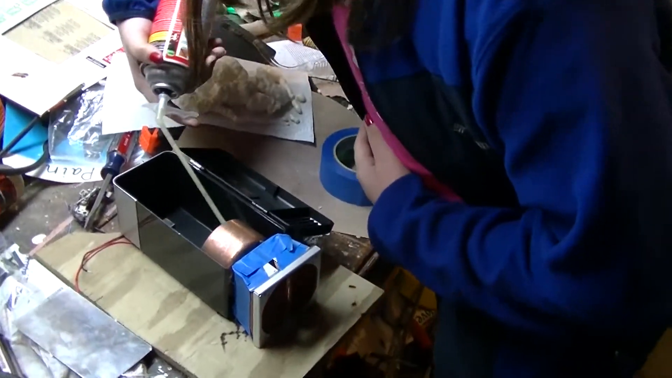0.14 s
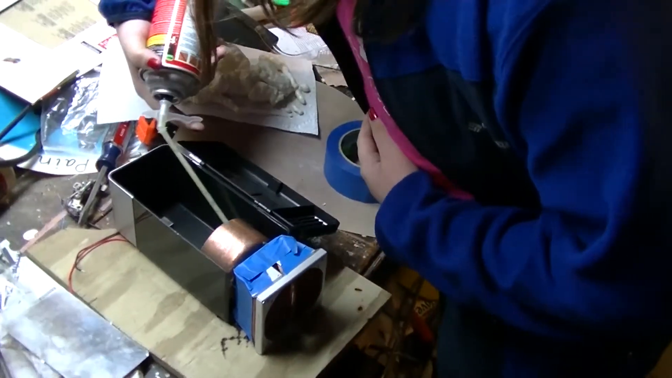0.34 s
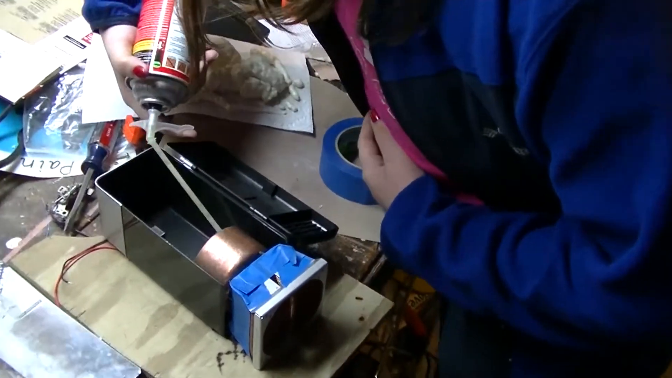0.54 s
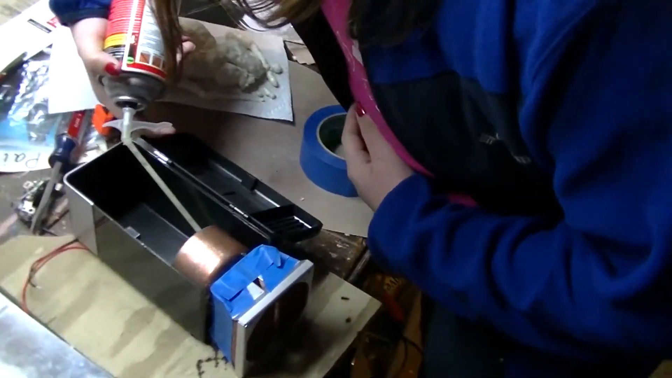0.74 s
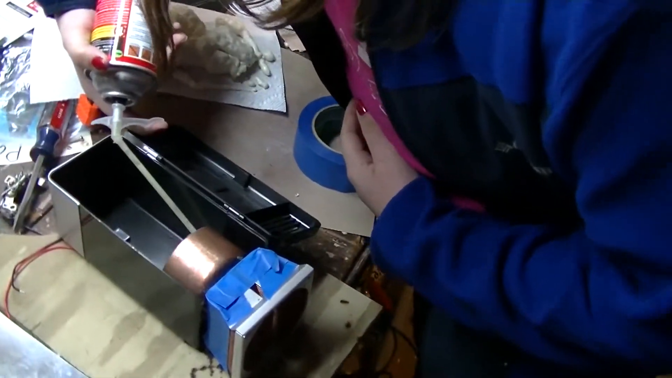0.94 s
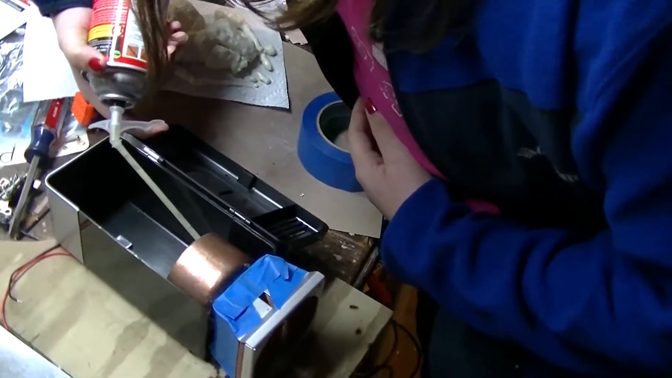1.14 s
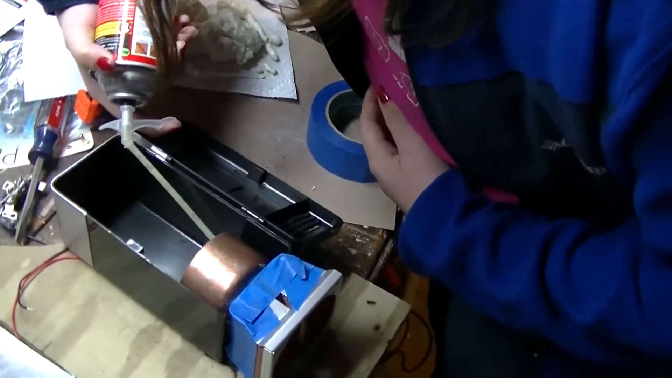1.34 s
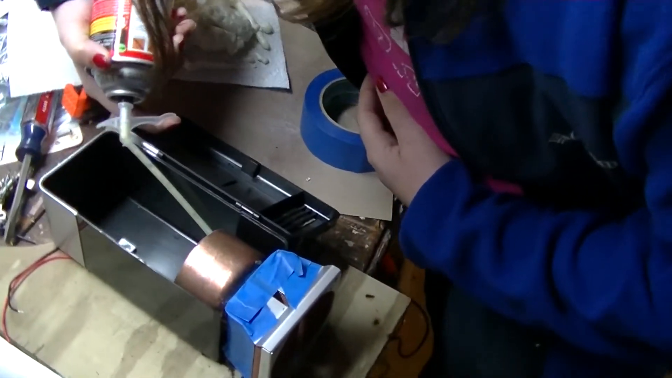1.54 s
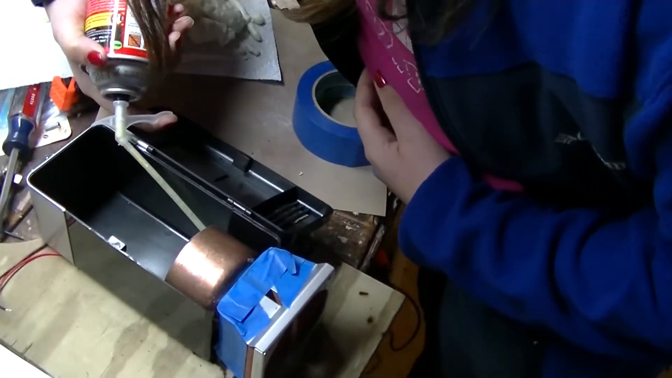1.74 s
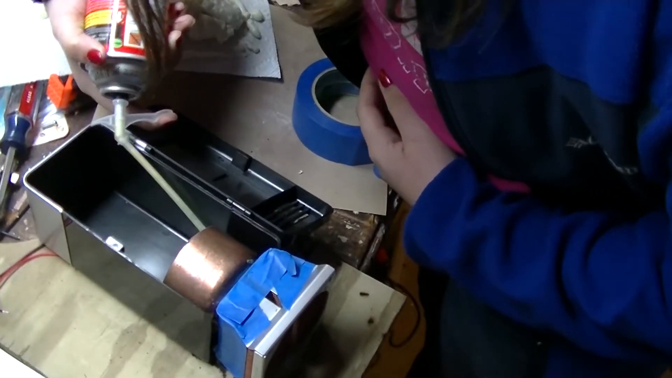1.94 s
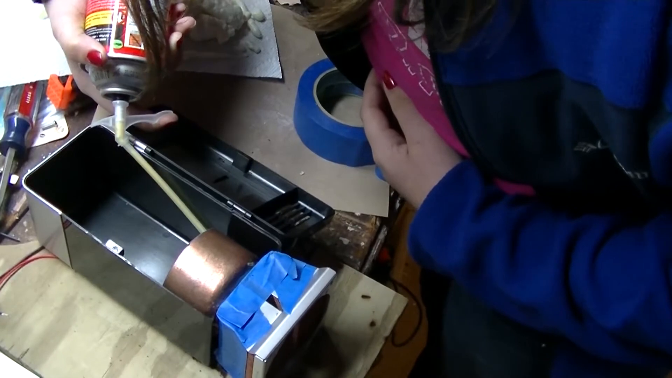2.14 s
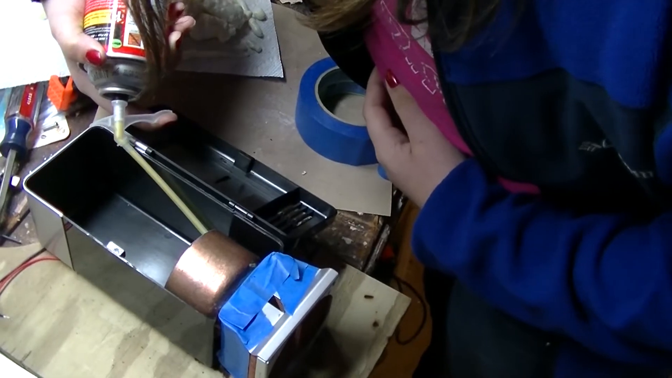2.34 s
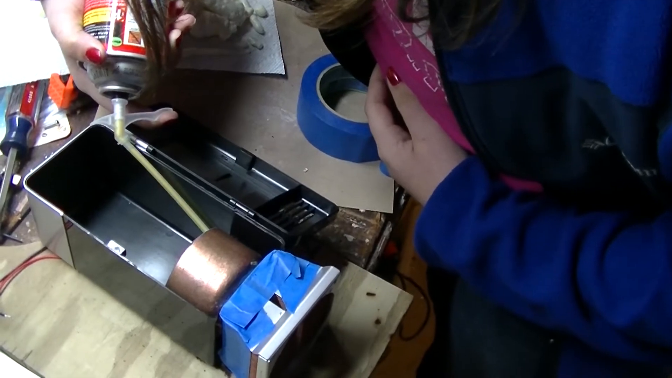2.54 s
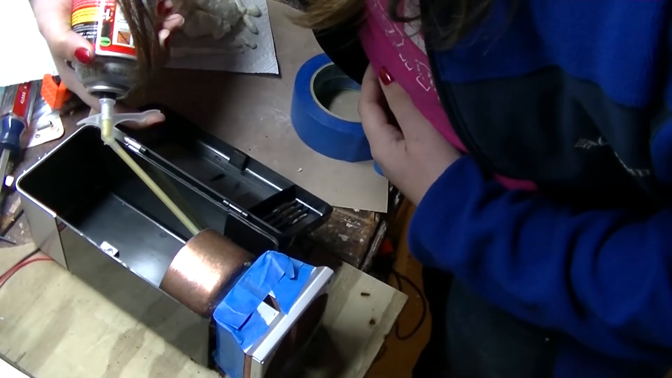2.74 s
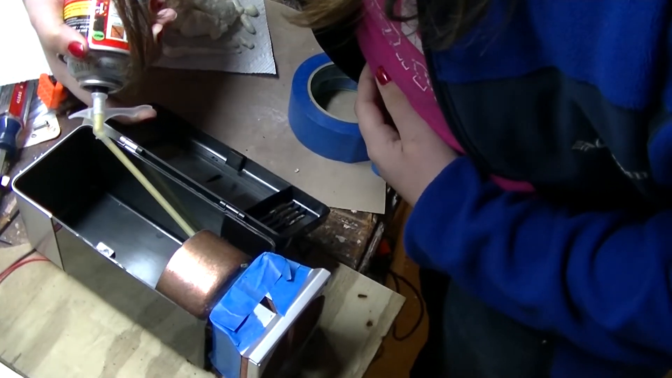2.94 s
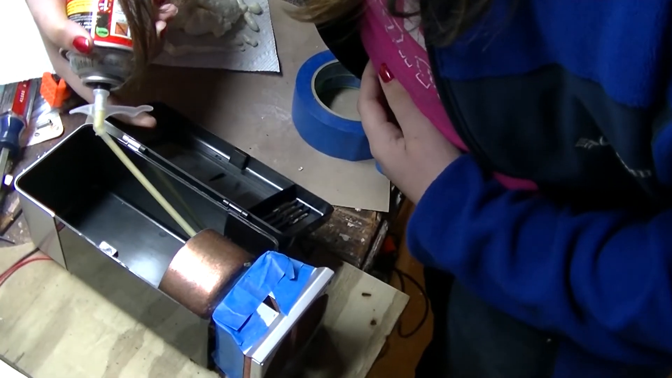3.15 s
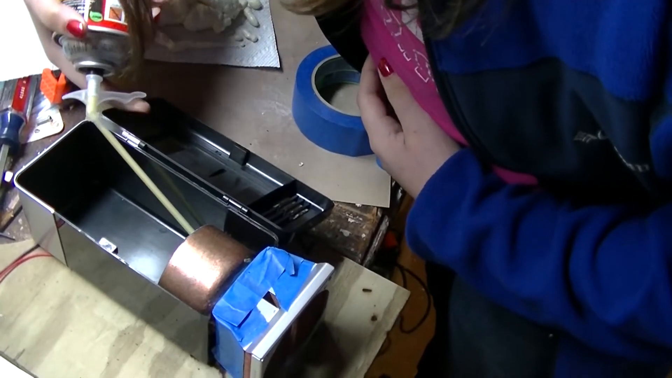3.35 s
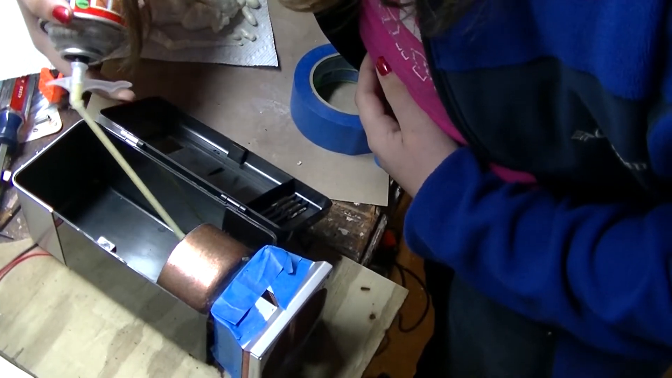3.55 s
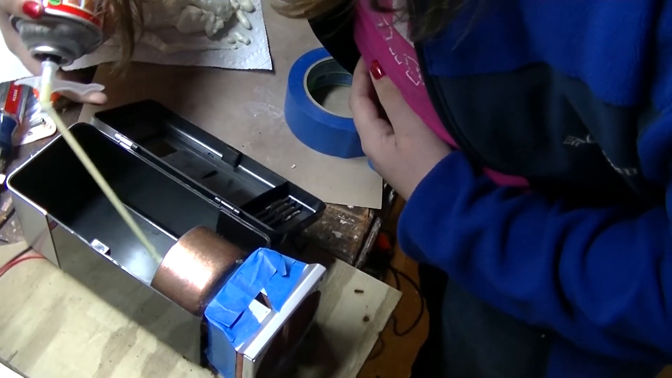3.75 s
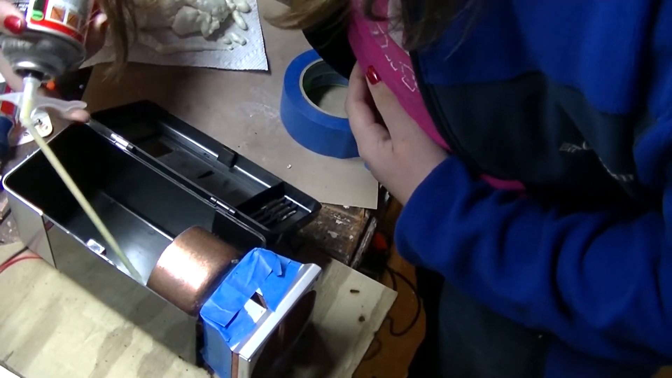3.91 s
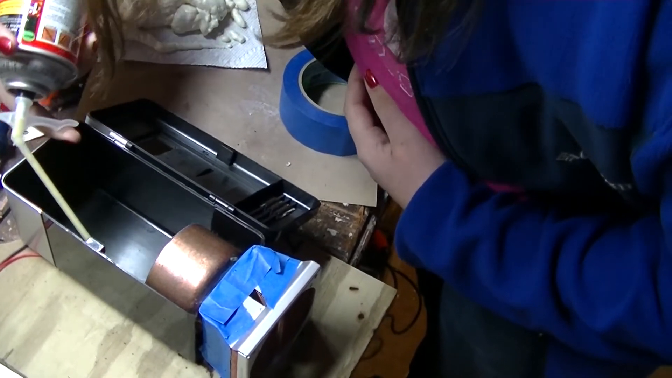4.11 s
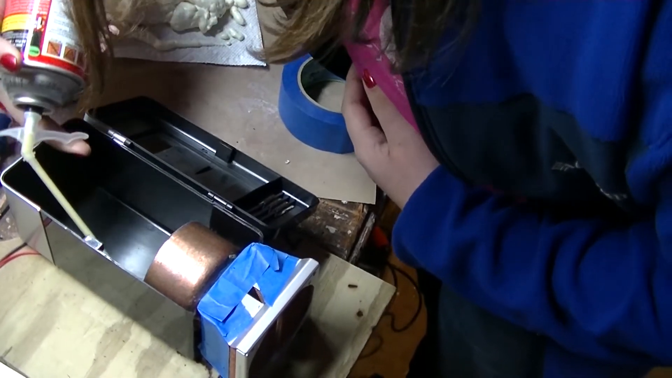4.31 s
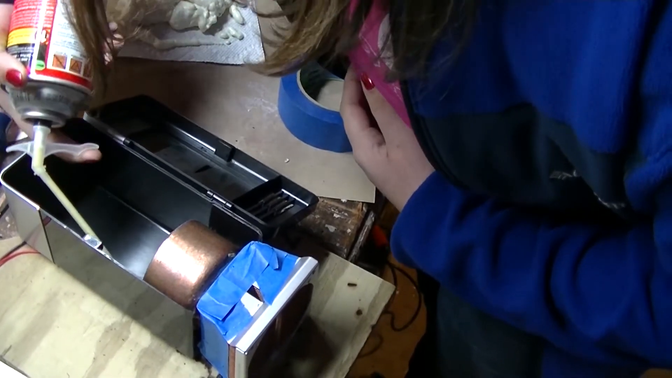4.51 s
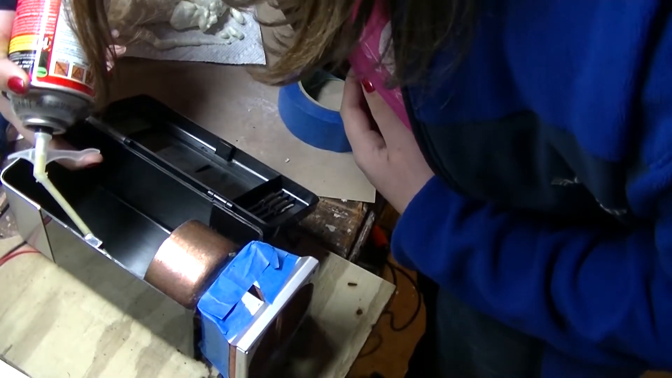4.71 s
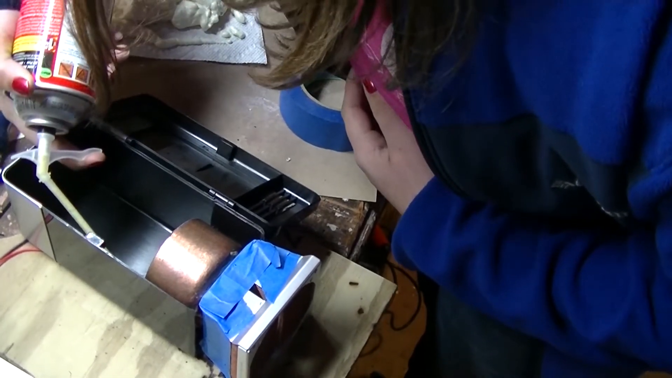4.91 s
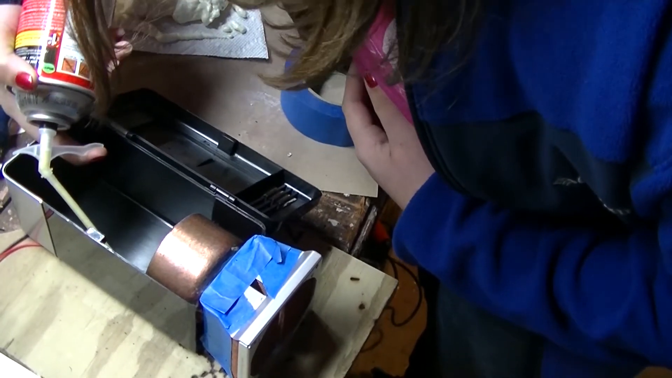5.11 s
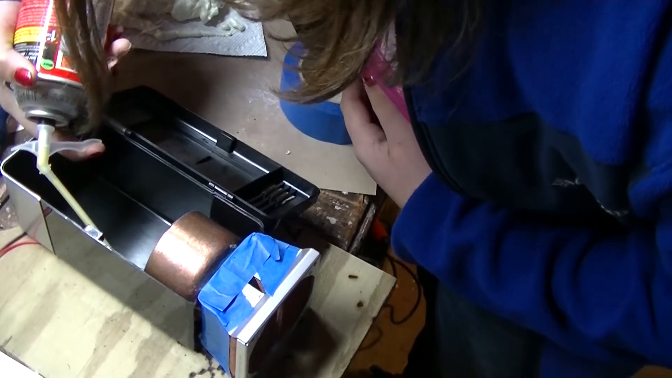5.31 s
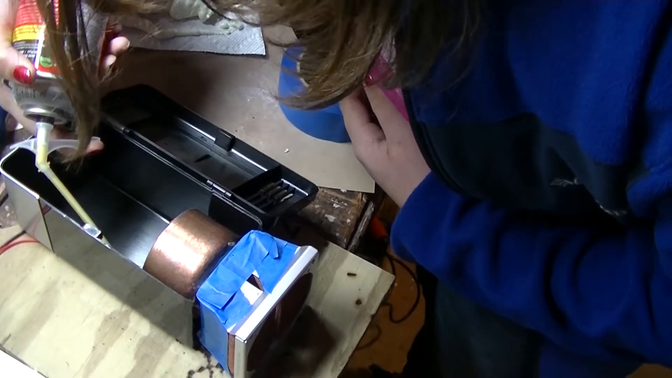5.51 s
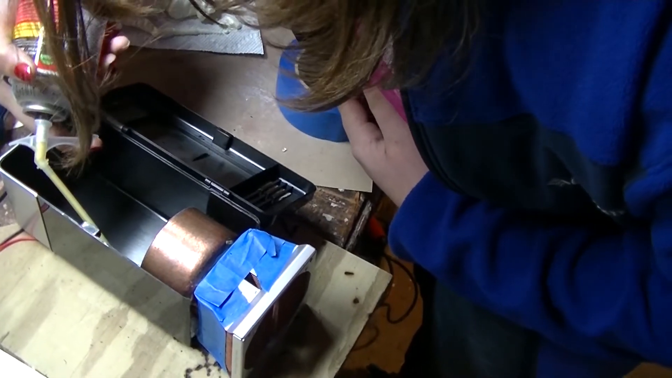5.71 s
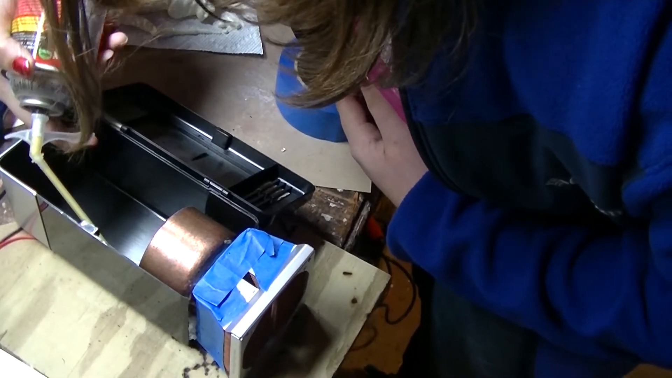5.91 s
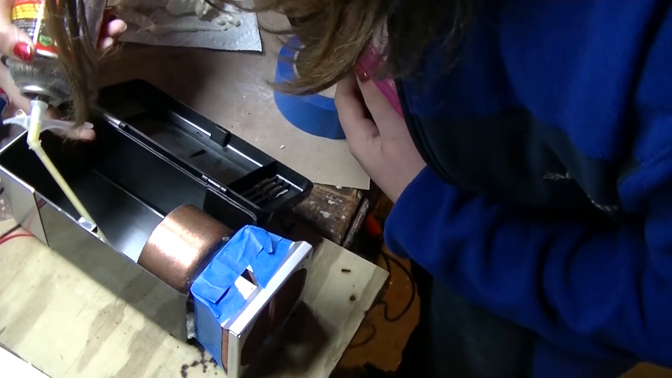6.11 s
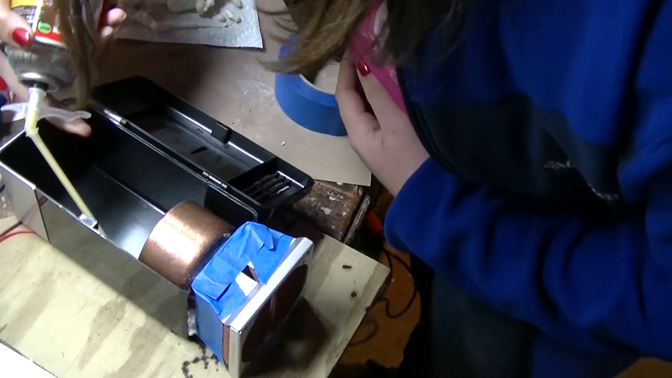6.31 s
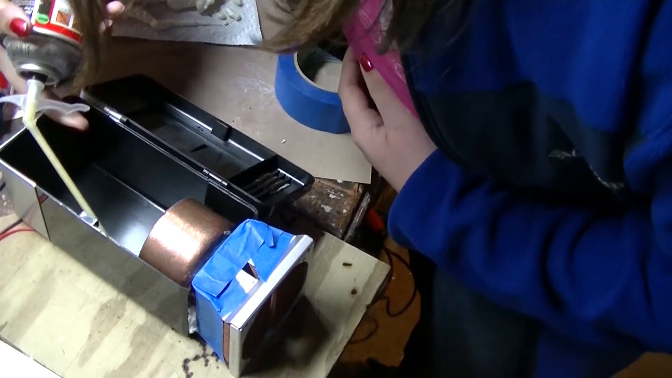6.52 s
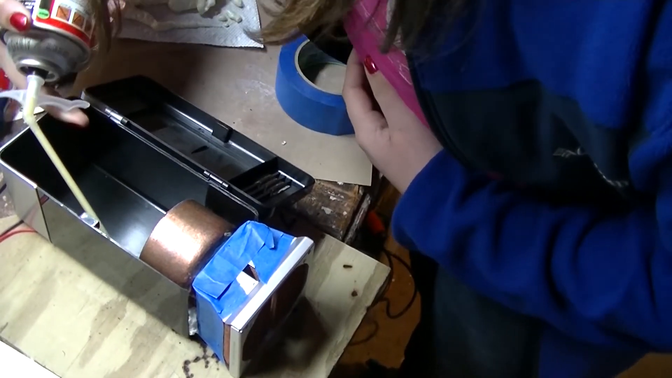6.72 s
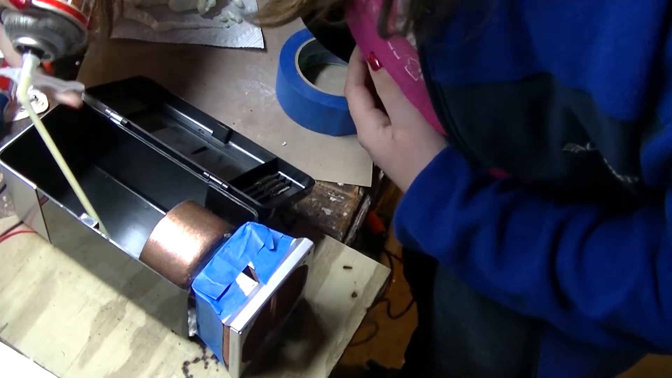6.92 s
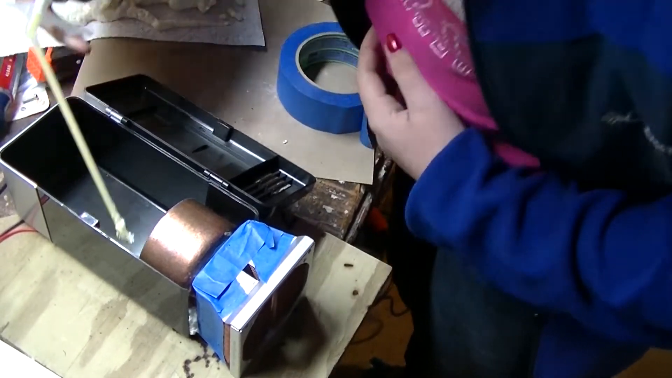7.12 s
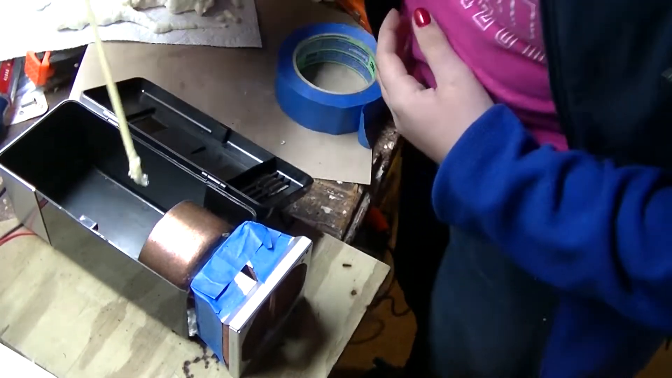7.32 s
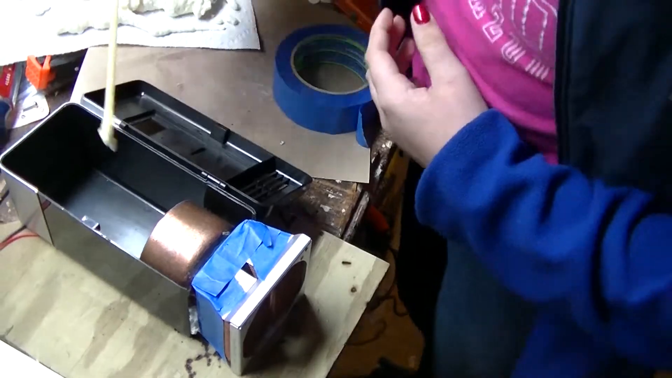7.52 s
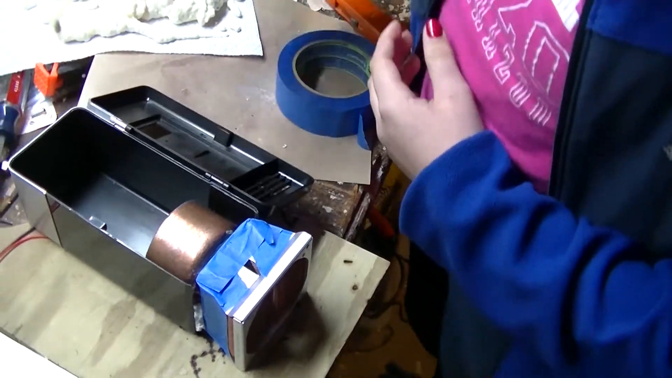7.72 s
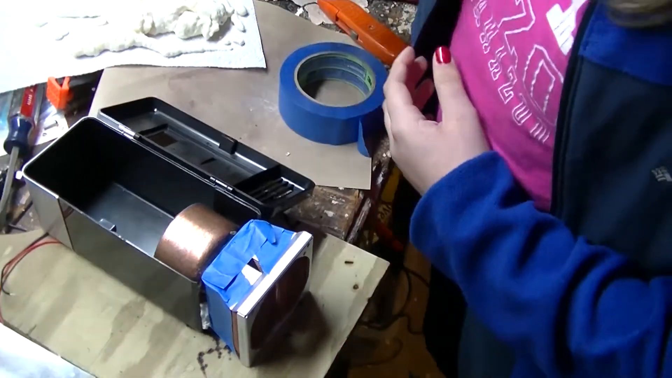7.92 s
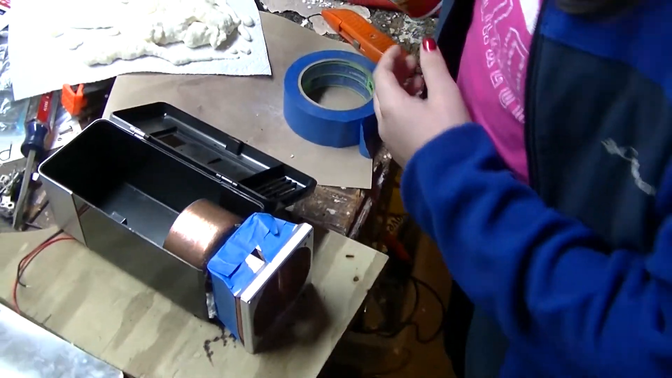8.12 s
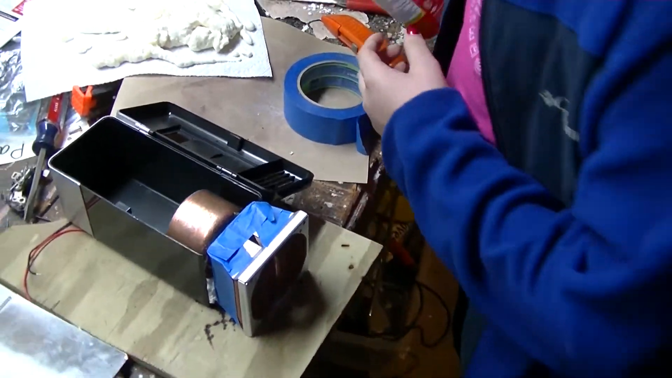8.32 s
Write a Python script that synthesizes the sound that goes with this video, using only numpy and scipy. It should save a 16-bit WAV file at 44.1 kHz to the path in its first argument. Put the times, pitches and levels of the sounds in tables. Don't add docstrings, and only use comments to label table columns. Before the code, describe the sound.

Two squirts of foam from a spray can hiss through a straw, then spit and gurgle wetly, followed by one sharp plastic click and light rustling.

```python
import sys
import numpy as np
from scipy import signal
from scipy.fft import rfft, irfft, next_fast_len
from scipy.io import wavfile
from scipy.ndimage import uniform_filter1d

SR = 44100
rng = np.random.default_rng(int(sys.argv[2]) if len(sys.argv) > 2 else 0)


def wav_out(sig):
    wavfile.write(sys.argv[1], SR, np.round(np.clip(np.atleast_2d(sig).T, -1, 1) * 32767).astype(np.int16))


def ratio_of_db(decibels):
    return 10 ** (np.asarray(decibels, float) / 20)


N = 372787


def rms_one(x):
    return x / np.sqrt(np.mean(x ** 2) + 1e-20)


def noise_pair(size=N):
    return rng.standard_normal((2, size))


def in_time(rows):
    s, *columns = np.transpose(rows)
    return [np.interp(np.arange(N) / SR, s, c, left=-120, right=-120) for c in columns]


def at_hz(points, hz):
    known_hz, value = np.array(points).T
    return np.interp(np.log(hz + 1), np.log(known_hz + 1), value)


def drift(rate, size=N):
    r = np.exp(-80 * np.pi * rate / SR)
    steps = rng.standard_normal(size // 40 + 2002)
    slow = signal.lfilter([1], [1, -2 * r, r * r], steps)[2000:]
    return np.interp(np.arange(size) / 40, np.arange(len(slow)), rms_one(slow))


def band(x, low, high):
    return signal.sosfilt(signal.butter(3, [low, min(high, .48 * SR)], "band", fs=SR, output="sos"), x)


def ring(clicks, hz, t60):
    r, w = ratio_of_db(-60 / (t60 * SR)), 2 * np.pi * hz / SR
    return signal.lfilter([0, np.sin(w)], [1, -2 * r * np.cos(w), r * r], clicks + 1e-18)


def coloured(x, slope, peaks=(), notches=(), under_db=0):
    hz = np.fft.rfftfreq(8192, 1 / SR)
    power = ratio_of_db(at_hz(slope, hz) + under_db) ** 2
    for centre, width, db in peaks:
        width = max(width, 70, centre / 35)
        power = power + ratio_of_db(db) ** 2 / (1 + (2 * (hz - centre) / width) ** 4)
    for centre, width, db in notches:
        depth = 1 - ratio_of_db(min(db, 0)) ** 2
        power = power * (1 - depth / (1 + (2 * (hz - centre) / width) ** 2))
    cepstrum = irfft(np.log(power + 1e-12) / 2)
    cepstrum[1:4096] *= 2
    cepstrum[4097:] = 0
    response = irfft(np.exp(rfft(cepstrum)))
    return signal.oaconvolve(x, response[None], axes=1)[:, :x.shape[1]]


def ports(pair, likeness, pan, phase):
    size = next_fast_len(N)
    hz = np.fft.rfftfreq(size, 1 / SR)
    mid, side = rfft(pair, size)
    alike = np.clip(at_hz(likeness, hz), -1, 1)
    tilt = ratio_of_db(at_hz(pan, hz) / 2) * np.exp(.5j * at_hz(phase, hz))
    shared, own = np.sqrt(1 + alike) * mid, np.sqrt(1 - alike) * side
    left = (shared + own) * tilt
    right = (shared - own) / tilt
    return irfft(np.array([left, right]), size)[:, :N] / np.sqrt(1 + alike.mean())


def puff(clicks, rise_s, fall_s):
    t = np.arange(int(.05 * SR)) / SR
    shape = (1 - np.exp(-t / rise_s)) * np.exp(-t / fall_s)
    return signal.oaconvolve(clicks, shape / shape.max())[:len(clicks)]


def bell(clicks, width_s, rise=1):
    t = np.arange(-800, 801) / SR
    width = width_s * np.where(t < 0, rise, 2 - rise)
    return signal.oaconvolve(clicks, np.exp(-.5 * (t / width) ** 2), "same")


def patchy(x, low, high, depth_db, tilt_db=0, pivot_hz=2000):
    edges, size = np.geomspace(low, high, 4), x.shape[1]
    slices = [band(x, a, b) * ratio_of_db(depth_db * drift(3.9, size=size)) for a, b in zip(edges, edges[1:])]
    octaves = np.maximum(np.log2(np.sqrt(edges[1:] * edges[:-1]) / pivot_hz), -1.7)
    tilted = sum(part * ratio_of_db(tilt_db * octave) for part, octave in zip(slices, octaves))
    return tilted / np.sqrt(np.mean(sum(slices) ** 2))


def bouts(rows, rest_db):
    rise_s, fall_db_per_s = 0.015, 113
    t, power = np.linspace(0, N / SR, 4000), ratio_of_db(rest_db) ** 2
    for s, length_s, db in rows:
        rise = np.clip((t - s) / rise_s + 1, 0, 1)
        power = power + (rise * ratio_of_db(db - fall_db_per_s * np.maximum(t - s - length_s, 0))) ** 2
    return np.interp(np.arange(N) / SR, t, np.sqrt(power))


# f/Hz, level/dB per Hz
HISS = [(12, -67), (20, -68), (123, -12.5), (172, -14.5), (270, -5), (301, -10), (399, -12), (590, -20.5),
        (1400, -22.5), (1570, -25.5), (1810, -18), (4940, -19.5), (16000, -33.5)]
# f/Hz, likeness (-1 to 1)
HISS_LIKENESS = [(60, 0.28), (250, -0.024), (800, -0.39), (4000, -0.065), (15000, 0.24)]
# f/Hz, left-right level/dB
HISS_PAN = [(100, -5.5), (700, -2), (2000, 1), (15000, -2)]


def microphone_hiss():
    hiss = ports(coloured(noise_pair(), HISS), HISS_LIKENESS, HISS_PAN, [(0, 0), (1, 0.0052)])
    return ratio_of_db(-55.5) * rms_one(hiss)


# f/Hz, level/dB, 60 dB decay/s
CASE = [(1473, 8, 0.021), (1910, 5.5, 0.023), (2360, 9, 0.0073), (2945, 9, 0.019), (3740, 0, 0.04),
        (4940, 7.5, 0.061)]
# start t/s, length/s, level/dB
FOCUSING = [
    (.2, 0.52, -52),
    (3.5, 0.37, -54),
    (6.23, 0.43, -56),
    (7.4, 0.29, -47),
    (8.1, .4, -53),
]


def lens_drive():
    at = (np.arange(0, N / SR, 1 / 30) * SR).astype(int)
    steps = np.zeros(N)
    uneven_db = 6.0 * rng.standard_normal(len(at)).clip(-3, 1.2)
    steps[at] = ratio_of_db(uneven_db + 0.5 * (-1) ** np.arange(len(at)))
    effort = bouts(FOCUSING, -62)
    nudge = rms_one(band(noise_pair(), 241.5, 397) * puff(steps, 0.0014, 0.016))
    nudge *= ratio_of_db(-66.5) + 0.2 * effort
    rings, grit = np.zeros(N), rng.standard_normal(N)
    for hz, db, t60 in CASE[:5]:
        kicks = np.zeros(N)
        kick_at = np.clip(at + rng.integers(-200, 200, len(at)), 0, N - 1)
        kicks[kick_at] = ratio_of_db(db + 7.0 * rng.standard_normal(len(at)).clip(-3, 1.5))
        rings += ring(rms_one(puff(kicks, 0.00056, 0.0079) * grit) * ratio_of_db(db), hz, t60)
    rings = rms_one(rings) * effort * ratio_of_db(-14)
    return nudge * ratio_of_db([[-2.0], [2.0]]) + rings * ratio_of_db([[-1.2], [1.2]])


# t/s, peak level/dB, centre f/Hz
TICKS = [(0.261, -41.5, 2130), (0.329, -40, 1730), (0.397, -44.5, 1900), (0.424, -61, 1900),
         (0.59, -46, 3300), (0.661, -41, 1700), (0.727, -48, 1900), (0.98, -47, 3400), (1.026, -52, 2700),
         (1.0946, -36.5, 4070), (3.2812, -37, 4130), (3.5217, -30, 1430), (3.56, -47, 2300),
         (3.598, -49, 2500), (3.663, -40.5, 2430), (3.73, -39.5, 2500), (3.794, -50, 3170),
         (3.832, -45.5, 1880), (3.861, -47, 3400), (3.929, -45, 2600), (3.997, -38.5, 2400),
         (4.3625, -41.5, 4700), (4.669, -44, 3470), (5.3815, -23, 3260), (6.2243, -30, 1910),
         (6.3005, -39, 1900), (6.635, -41, 1900), (7.0473, -40, 5900), (7.3208, -48, 10700),
         (7.372, -41, 1310), (7.371, -45.5, 7400), (7.426, -29, 1810), (7.502, -39, 1990),
         (7.5717, -36.5, 2260), (7.6264, -45.5, 10400), (7.6495, -47, 10700), (7.761, -41.5, 1940),
         (7.835, -42.5, 1830), (8.0398, -51, 2600), (8.1188, -30.5, 4400), (8.325, -39, 1960),
         (8.3932, -32.5, 4250), (8.404, -46, 1500)]


def ticks():
    out, t = np.zeros((2, N + SR)), np.arange(int(.05 * SR)) / SR
    for s, peak_db, hz in TICKS:
        hard = peak_db > -35
        length_s = .0032 if hz < 4000 or hz > 5500 else .0012
        rise_s = .00015 if hard else .0016
        chatter = noise_pair(len(t)) * (1 - np.exp(-t / rise_s)) ** 2 * np.exp(-t / length_s)
        chatter[:, 8] += 5.0 * hard
        modes = sum(ratio_of_db(db - 15.0 * abs(np.log2(f / hz))) * ring(chatter, f, t60) for f, db, t60 in CASE)
        spread = 1 + min(.9, 2000 / hz)
        direct = rms_one(band(chatter, max(hz / spread, 1100), max(hz * spread, 4300)))
        ringing = np.clip(1.5 - hz / 5000, 0, 1) * rms_one(band(modes, 1300, 4700))
        sound = band(ringing + direct, 1410, 11200)
        at = int(s * SR)
        out[:, at:at + len(t)] += ratio_of_db(peak_db) * sound / np.abs(sound[0]).max()
    return out[:, :N]


# t/s, peak level/dB, f/Hz
THUMPS = [(0.091, -47, 180), (0.302, -42, 190), (0.358, -40, 221), (0.391, -41, 142), (0.461, -45, 260),
          (0.494, -40, 262), (0.559, -51, 150), (0.957, -47, 130), (1.098, -48, 130), (1.17, -44, 200),
          (1.233, -44, 170), (1.002, -41, 290), (1.196, -42.5, 161), (1.261, -41, 133.6), (3.177, -43, 241),
          (6.028, -42, 320), (6.551, -52, 91), (7.248, -51, 70), (7.371, -30.5, 344), (7.448, -41, 154),
          (7.57, -37.5, 250), (8.178, -38, 298), (8.362, -42.5, 163), (8.432, -43, 156)]


def thumps():
    out, t = np.zeros((2, N + SR)), np.arange(int(.1 * SR)) / SR
    for s, peak_db, hz in THUMPS:
        swing = np.sin(2 * np.pi * hz * t + rng.uniform(0, 1.45, (2, 1)))
        swing *= (1 - np.exp(-t / 0.000084)) * np.exp(-t * hz)
        at = int((s + 0.0018) * SR)
        out[:, at:at + len(t)] += ratio_of_db(peak_db - 2.0) * swing * ratio_of_db([[-2.5], [2.5]])
    return band(out[:, :N], 45, 3000)


# start t/s, length/s, level/dB
GRIPS = [
    (.35, 0.27, -63),
    (.95, 0.31, -70),
    (3.13, 0.076, -67),
    (6.0, 0.029, -62),
    (7.37, 0.026, -55.5),
    (7.4, 0.27, -63),
    (8.1, .4, -61),
]


def grip_rumble():
    shared, own = noise_pair()
    rumble = rms_one(band(shared + 0.27 * own * [[1], [-1]], 57, 288))
    return rumble * bouts(GRIPS, -79.5) * ratio_of_db(1.1 * drift(16)) * ratio_of_db([[-2.2], [2.2]])


# t/s, rustle level/dB
HANDS = [(0, -48), (.55, -54.5), (.72, -64), (1.1, -51.5), (1.4, -61), (3.1, -51), (3.85, -65.5),
         (4.0, -71), (4.25, -63), (6.15, -52), (6.33, -51.5), (6.9, -64), (7.355, -48), (7.375, -43.5),
         (7.55, -45.5), (7.63, -40.5), (7.68, -50.5), (7.74, -53), (8.46, -53.5)]
# f/Hz, level/dB per Hz
RUSTLE = [(290, -28), (500, 4), (697, -24.5), (840, -6), (1100, -7.5), (1470, -3.5), (3880, 3), (7640, -12),
          (10600, -20), (12000, -56), (15600, -48), (22000, -120)]
# f/Hz, width/Hz, level/dB
SCRAPE = [(794, 120, -5), (1600, 240, 4.5), (1900, 235, -10), (3800, 100, -13)]
# start t/s, length/s, level/dB
DRAGS = [
    (0, 0.74, -61),
    (7.372, 0.27, -53.5),
]


def sleeves_and_box():
    rustle_db, = in_time(HANDS)
    catches = (rng.random(N) < 160 / SR) * rng.exponential(1, N)
    grains = 1 + 0.26 * puff(catches, 0.00072, 0.0042)
    rub = coloured(noise_pair() * grains, RUSTLE, SCRAPE, under_db=13.0)
    cloth = patchy(rub, 2260, 15400, depth_db=2.5) * ratio_of_db(rustle_db - 8.0 + 1.6 * drift(8.0))
    sliding = np.hypot(ratio_of_db(rustle_db - 14.5), bouts(DRAGS, -120))
    return cloth + patchy(rub, 567, 2020, depth_db=2.0) * sliding * ratio_of_db(-4.0)


# t/s, level/dB
SNAP = [
    (7.0845, -57),
    (7.094, -30),
    (7.1005, -22),
]
# f/Hz, level/dB, 60 dB decay/s
LATCH = [(393, -24, 0.01), (620, -26, 0.0089), (821, -33.5, 0.079), (838, -37, 0.11), (2200, -11, 0.016),
         (3700, -13, .014)]
# f/Hz, level/dB per Hz
CRACK = [(60, -51), (250, -22), (600, -3), (1150, -10), (1900, 3.5), (2700, -4.5), (3700, 3), (7000, -3),
         (10000, -17), (15500, -36)]


def snap():
    (creak_s, creak_db), (slip_s, slip_db), (hit_s, hit_db) = SNAP
    start, size = int(creak_s * SR), SR // 5
    noise, out = rng.standard_normal((3, size)), np.zeros((2, N))
    creak, slip, hit = clicks = np.zeros((3, size))
    clicks[[0, 1, 2], [0, int(slip_s * SR) - start, int(hit_s * SR) - start]] = 1
    chatter = np.array([noise[0], np.roll(noise[0], 1)]) + 0.35 * noise[1:]
    sound = rms_one(band(chatter, 4300, 5200)) * ratio_of_db(creak_db) * puff(creak, 0.00078, 0.00087)
    sound += rms_one(band(chatter, 2500, 9800)) * ratio_of_db(slip_db) * puff(slip, 0.0006, 0.00077)
    level = np.sqrt(np.mean(coloured(chatter, CRACK) ** 2))
    crack = band(chatter, 20, 5500) * puff(hit, 0.0006, 0.003)
    crack += band(chatter, 5500, 20000) * puff(hit, 0.0003, 0.0009)
    sound += coloured(crack, CRACK) / level * ratio_of_db(hit_db + 3.0)
    late = np.array([hit, np.roll(hit, 8)])
    t = np.maximum(np.arange(size) / SR - (hit_s - creak_s), 0)
    for hz, db, t60 in LATCH:
        sound += ratio_of_db(db) * ring(late, hz, t60) * (1 - np.exp(-t / (0.13 * t60))) * 2
    out[:, start:start + size] = band(sound, 60, 20000)
    return out


PLUG_S = 0.002

# t/s, length/s, first f/Hz, last f/Hz, level/dB
HOLLOWS = [(1.254, 0.95, 6240, 6400, -50), (1.3, 1, 4140, 4186, -51), (1.244, 0.15, 2450, 2500, -59),
           (1.188, 0.45, 4410, 4260, -49.5), (2.233, 0.046, 3000, 2970, -39.5),
           (2.316, 0.069, 3000, 3040, -41.5), (2.515, 0.18, 3030, 2830, -29),
           (2.533, 0.083, 4250, 4320, -36), (2.549, 0.22, 2220, 2237, -30), (2.611, 0.15, 1900, 1857, -25),
           (2.7, 0.21, 1470, 1422, -36.5), (4.871, 0.48, 3750, 3940, -46),
           (5.002, 0.66, 10170, 10000, -55.5), (5.624, 0.64, 9960, 9960, -61),
           (5.721, 0.174, 1400, 1447, -38), (5.63, 0.061, 2720, 2680, -36.5),
           (5.721, 0.17, 2150, 2143, -36), (5.751, 0.13, 3990, 3790, -31), (5.741, 0.164, 2600, 2480, -46),
           (5.767, 0.12, 3540, 3000, -29.5), (5.923, 0.13, 2760, 2900, -37), (5.991, 0.11, 3500, 3700, -31),
           (7.391, 0.18, 830, 880, -58), (7.37, 0.087, 1300, 1710, -56), (7.478, 0.12, 3950, 3900, -56),
           (7.652, 0.19, 950, 993, -71), (7.74, 0.077, 1510, 1690, -59), (7.85, 0.092, 2150, 2150, -63)]


def hollows(spits):
    out, plugs = np.zeros((2, N)), np.zeros(N)
    plugs[(np.array(spits)[:, 0] * SR).astype(int)] = 1
    for s, length_s, first_hz, last_hz, db in HOLLOWS:
        start, size = int(s * SR), int(length_s * SR)
        noise = rng.standard_normal((2, 2, SR))[:, :, :size]
        width_hz = first_hz / (15 * (1 + 1.1 * length_s))
        slow = signal.sosfilt(signal.butter(2, width_hz / 2, fs=SR, output="sos"), noise)
        turn = 2 * np.pi * np.cumsum(np.linspace(first_hz, last_hz, size)) / SR
        note = rms_one(slow[0] * np.cos(turn) + slow[1] * np.sin(turn))
        out[:, start:start + size] += ratio_of_db(db) * note * np.sqrt(2 * np.hanning(size))
    spitting = np.minimum(bell(plugs, 0.0093), 1)
    return out * (0.55 - 0.25 * spitting + 0.77 * bell(plugs, 1.16 * PLUG_S))


# f/Hz, level/dB per Hz
FOAM = [
    [(120, -46), (200, -48), (334, -23.5), (706, -26.5), (912, -11), (1100, -25), (1390, -21), (1900, -0.5),
     (4900, -10), (15800, -53)],
    [(120, -60), (200, -21.5), (408, -11.5), (499, -17.5), (964, -13), (1100, -45), (1290, -5.5), (3460, 2),
     (10200, -23.5), (15800, -85)],
]
# f/Hz, width/Hz, level/dB
BOX = [
    [(990, 63, -19), (1430, 360, -12), (1810, 140, -13), (2220, 39, -10), (2530, 48, -8), (2910, 100, -5),
     (3400, 83, -29), (3880, 180, -15), (4980, 130, -14.5), (6340, 150, -20)],
    [(970, 205, -12), (1280, 320, -9), (2200, 62, -9), (2600, 280, -2.5), (3270, 35, -24), (3440, 31, -23),
     (3760, 31, -3.5), (4820, 78, -9), (5050, 56, -8.5)],
]
# f/Hz, width/Hz, depth level/dB
BOX_NOTCHES = [(482, 84, -39), (1086, 350, -16.5)]


def spit(k, plugs, body, edge):
    size = len(plugs)
    blast = rms_one(coloured(noise_pair(size), FOAM[k], BOX[k], BOX_NOTCHES, under_db=-6.5))
    blast /= np.sqrt(uniform_filter1d(blast ** 2, 260, axis=1)) + .2
    bright = coloured(noise_pair(size), [(5000, 1), (10200, -10.5), (11000, -14.5), (15800, -19)])
    bright = rms_one(band(bright, 4100, 15000))
    return blast * bell(np.roll(body, -40), PLUG_S, rise=0.55) + bright * bell(edge, 1.9 * PLUG_S)


# f/Hz, level/dB per Hz
GAS = [
    [(290, -21.5), (500, -52), (1080, -24.5), (1300, -6), (2900, 5.5), (4180, -5), (5580, -8), (6270, 2.5),
     (7450, -21), (13000, -36), (15800, -48)],
    [(290, -96), (500, -31), (595, -44), (2000, -25.5), (3950, -2.5), (5580, -10), (6090, -6),
     (9950, -11.5), (13800, -19), (15800, -28)],
]
# f/Hz, width/Hz, level/dB
STRAW = [
    [(2400, 380, -2), (3980, 480, 2.5), (4700, 830, 1), (6230, 370, -13), (7980, 1460, -13.5),
     (9800, 1000, -21), (11750, 700, -27.5)],
    [(3490, 87, 3.5), (3900, 200, 5.5), (4700, 500, 1.5), (6140, 310, -3.5), (7640, 200, -8),
     (8440, 350, -6), (10070, 290, -14.5)],
]
JET_EDGES_HZ = [250, 1100, 3300, 7000, 15800]
# t/s, flow level/dB, brightness/dB per octave
GAS_FLOW = [
    [(1.085, -72, 7), (1.1, -61, 2), (1.35, -48.5, 0.5), (1.9, -40.5, 1.5), (2.42, -40.5, 2),
     (2.99, -37, -3), (3.15, -56, 6), (3.55, -65, 17.5), (3.62, -61, 4)],
    [(4.86, -61.5, -2), (4.93, -45, -3.5), (5.14, -36.5, -2.5), (5.54, -39.5, 3), (5.59, -42, -3),
     (5.95, -34, -3.5), (6.12, -48.5, -2), (6.3, -70.5, 10.5), (6.6, -61, 0)],
]
# t/s, flow level/dB, brightness/dB per octave
FOAM_FLOW = [
    [(2.0, -62.5, -7.5), (2.29, -39, -6), (2.4, -49, -4), (2.5, -33, 2.5), (2.64, -21.5, 1),
     (2.75, -20.5, -0.5), (2.9, -33, -7), (3.05, -47, -12), (3.2, -68, -16.5)],
    [(5.15, -58.5, 2), (5.47, -47.5, -2), (5.61, -40, 0), (5.72, -31.5, 1), (5.77, -24.5, 1.5),
     (5.94, -28.5, -2.5), (6.07, -33, -2), (6.14, -46, -6), (6.26, -67, -8)],
]
GAS_SHARES_DB = [
    (-18.5, -8, 0, -12.5),
    (-46, -11, 0.0083, -11.5),
]
FOAM_SHARES_DB = [
    (-16.5, 0, -8, -26),
    (-13, 0, -2.5, -25),
]
# t/s, level/dB, treble level/dB relative to it
FIRST_SPITS = [(1.961, -36, 5), (1.9832, -38.5, 1), (2.005, -35, -4), (2.0813, -35, 0.5),
               (2.1193, -35.5, -2), (2.1402, -32, -12), (2.153, -33, -7), (2.2138, -32.5, -6),
               (2.2455, -33, -3), (2.259, -28, -14), (2.278, -30, -8), (2.3012, -31, -5), (2.318, -31, -9),
               (2.3313, -29, -15), (2.342, -27.5, -13), (2.349, -31, -17), (2.366, -33.5, -5),
               (2.4007, -33.5, -3.5), (2.4175, -28.5, -23), (2.4386, -26, -11.5), (2.4554, -47, -20),
               (2.4693, -23.5, -17), (2.486, -26, -24), (2.498, -29, -26), (2.51, -19, -24),
               (2.5237, -22, -18), (2.5395, -16, -21), (2.554, -21, -17), (2.5633, -26, -5.5),
               (2.5795, -16, -23), (2.601, -20, -25), (2.6185, -20, -24), (2.633, -20, -32),
               (2.644, -27, -35), (2.653, -34, -31), (2.662, -18, -28.0), (2.68, -27, -32),
               (2.6975, -18, -34), (2.708, -18, -25), (2.7252, -18.5, -34), (2.734, -29, -30.0),
               (2.746, -22, -21), (2.755, -26, -22), (2.7636, -23, -22), (2.7743, -19.5, -26),
               (2.785, -18, -24.0), (2.809, -20.5, -21), (2.822, -21, -16), (2.835, -25, -15),
               (2.869, -23.5, -16), (2.88, -23, -15), (2.9203, -25, -14), (2.9434, -26, -17)]
SECOND_SPITS = [(5.3755, -23.5, -6.5), (5.401, -35, 2), (5.4127, -36, 0), (5.432, -38, 6),
                (5.4459, -43.5, 10.5), (5.475, -35, -5), (5.483, -32, -6), (5.502, -42, -11),
                (5.521, -29.5, 3.5), (5.544, -44, -18), (5.5513, -29, -7), (5.5766, -26.5, -23),
                (5.5901, -20, -25), (5.602, -38, -20.0), (5.613, -30, -24), (5.623, -28.5, -27),
                (5.643, -23, -21), (5.6513, -26.5, -28), (5.6592, -30, -21), (5.6675, -27, -18),
                (5.6864, -21.5, -18), (5.7078, -21.5, -24), (5.7239, -38, -20), (5.7312, -17.5, -32),
                (5.7477, -22, -28), (5.7573, -42, -19), (5.777, -25, -25.0), (5.795, -19.5, -29),
                (5.811, -24, -29), (5.83, -21, -33), (5.839, -26, -27), (5.857, -23.5, -28),
                (5.8652, -21, -29.0), (5.8827, -22.5, -23.0), (5.9174, -27, -25), (5.945, -27, -19),
                (5.965, -29.0, -20.0), (5.977, -23, -21.0), (5.9978, -23, -12), (6.01, -30, -10),
                (6.035, -28, -20.0), (6.0485, -25, -30), (6.0773, -38, -28.0), (6.0881, -46, -21)]


def squirt(k, spits):
    span = slice(int(GAS_FLOW[k][0][0] * SR), int(GAS_FLOW[k][-1][0] * SR))
    size = span.stop - span.start
    gas_db, gas_tilt = np.array(in_time(GAS_FLOW[k]))[:, span]
    foam_db, foam_tilt = np.array(in_time(FOAM_FLOW[k]))[:, span]
    gas_tilt, foam_tilt = np.clip([gas_tilt, foam_tilt], -20, 20)
    flicker = ratio_of_db(1.1 * drift(32.0, size=size))
    gas = coloured(noise_pair(size) * flicker, GAS[k], STRAW[k], BOX_NOTCHES, under_db=-1.5)
    bubbles = (rng.random(size) < 120 / SR) * np.minimum(rng.exponential(1, size), 2.2)
    sputter = rms_one(1 + 0.25 * puff(bubbles, 0.001, 0.0015))
    foam = coloured(noise_pair(size) * sputter, FOAM[k], BOX[k], BOX_NOTCHES, under_db=-10)
    jet = np.zeros((2, size))
    bands = zip(JET_EDGES_HZ, JET_EDGES_HZ[1:], GAS_SHARES_DB[k], FOAM_SHARES_DB[k])
    for low, high, gas_share_db, foam_share_db in bands:
        mix = ratio_of_db(gas_db + gas_share_db) * patchy(gas, low, high, 1.1, gas_tilt, 4800)
        mix += ratio_of_db(foam_db + foam_share_db) * patchy(foam, low, high, 0.66, foam_tilt, 2000)
        jet += ratio_of_db(0.053 * drift(14.0, size=size)) * mix
    s, peak_db, treble_db = np.transpose(spits)
    at = (s * SR).astype(int) - span.start
    plugs, body, edge = np.zeros((3, size))
    plugs[at] = 1
    body[at] = ratio_of_db(peak_db - 3.5)
    edge[at] = ratio_of_db(peak_db + treble_db - 5.5)
    jet *= ratio_of_db(-6 * np.minimum(bell(plugs, 0.006), 1))
    out = np.zeros((2, N))
    out[:, span] = jet + spit(k, plugs, body, edge)
    return out


# f/Hz, likeness (0 to 1)
JET_LIKENESS = [(200, 0.8), (650, 0.97), (2000, 0.95), (4000, 0.9), (6200, 0.8), (7900, 0.55),
                (10000, 0.75), (15000, 0.2)]
# f/Hz, left-right level/dB
JET_PAN = [(200, -13), (520, -13), (1200, -8), (1900, -3), (4000, -4), (5100, -1.5), (6200, 6.5),
           (7700, -7), (10000, -9), (13000, -5)]
# f/Hz, phase by which left leads/radians
JET_PHASE = [(200, .3), (1100, .85), (2400, .5), (3100, .25), (5000, .35), (7900, -1.1), (10000, 0),
             (15000, 1.2)]


def scene():
    bench = squirt(0, FIRST_SPITS) + squirt(1, SECOND_SPITS) + hollows(FIRST_SPITS + SECOND_SPITS)
    bench += ticks() + sleeves_and_box()
    bench = signal.sosfilt(signal.butter(3, 170, "high", fs=SR, output="sos"), bench)
    camera = grip_rumble() + thumps() + lens_drive() + microphone_hiss()
    return ports(bench, JET_LIKENESS, JET_PAN, JET_PHASE) + snap() + camera


def top_cut(x):
    return signal.sosfilt(signal.butter(12, 16340, fs=SR, output="sos"), x)


def record(dry):
    rounded = .55 * np.tanh(dry / .55)
    cut = signal.sosfilt(signal.cheby2(16, 60, 16130, fs=SR, output="sos"), rounded)
    return top_cut(cut)


dry = scene()
out = record(dry)
wav_out(out)
```